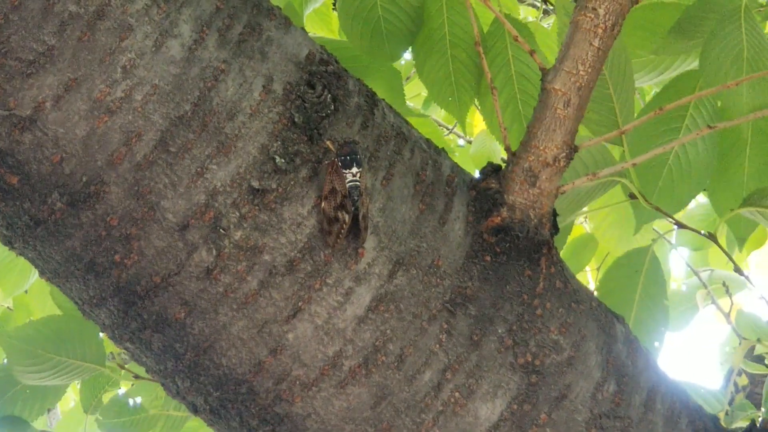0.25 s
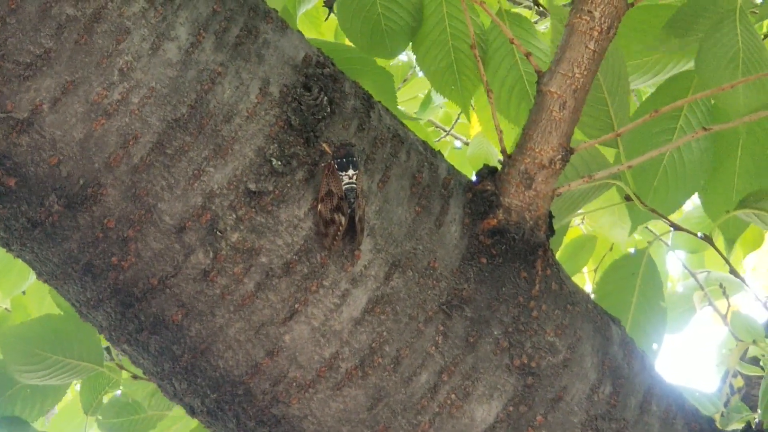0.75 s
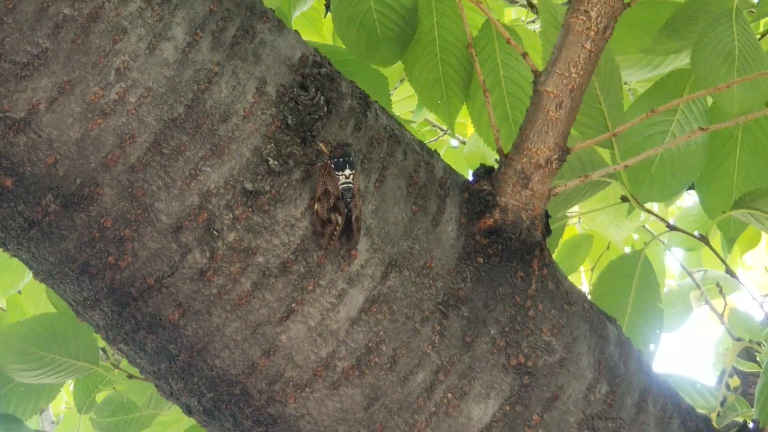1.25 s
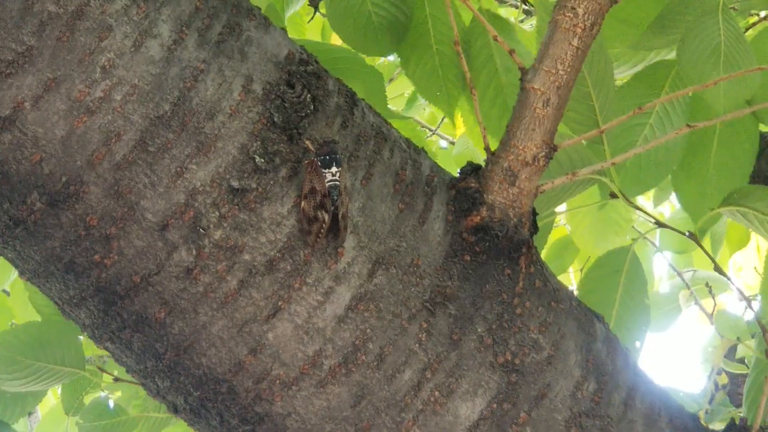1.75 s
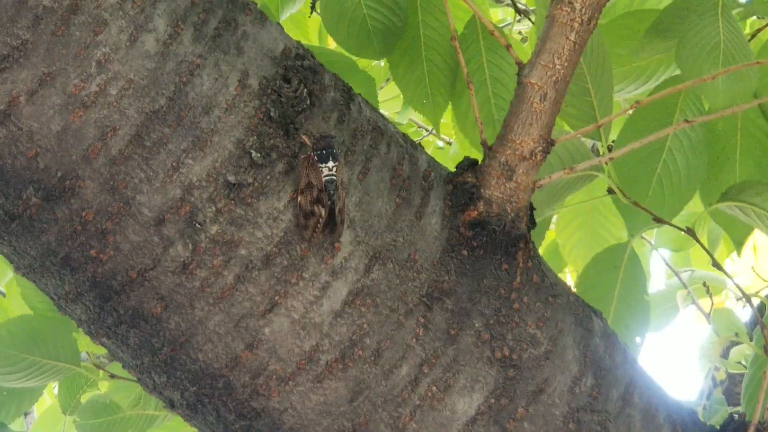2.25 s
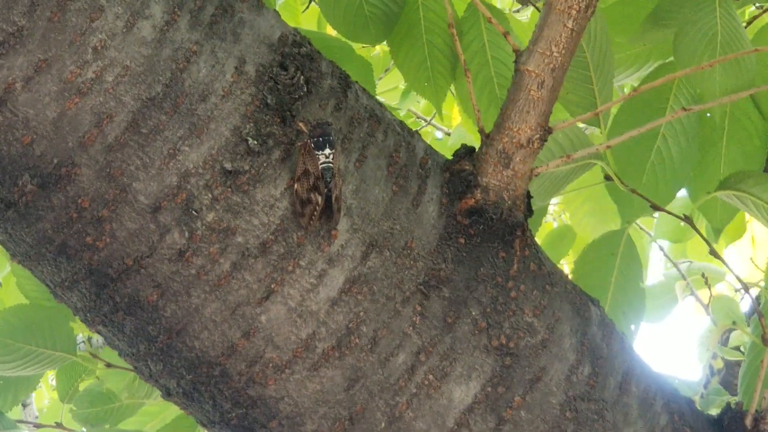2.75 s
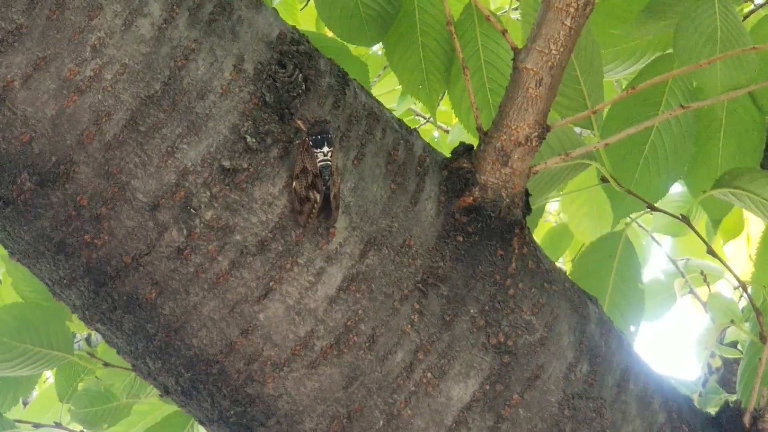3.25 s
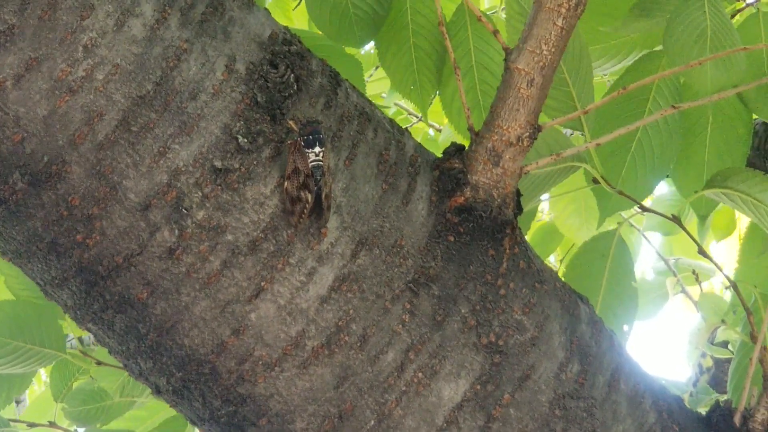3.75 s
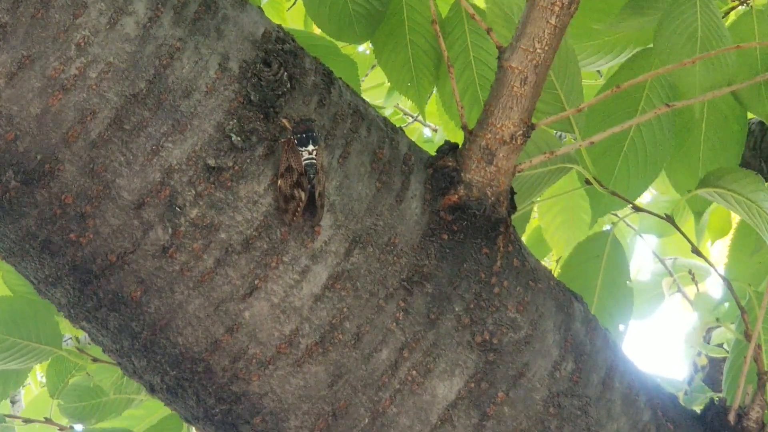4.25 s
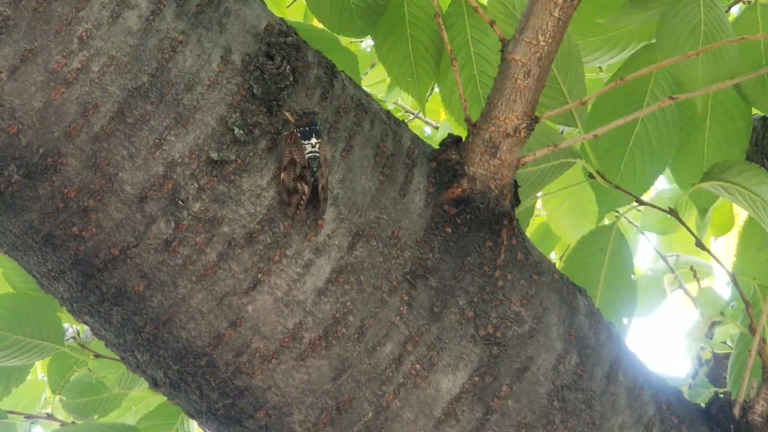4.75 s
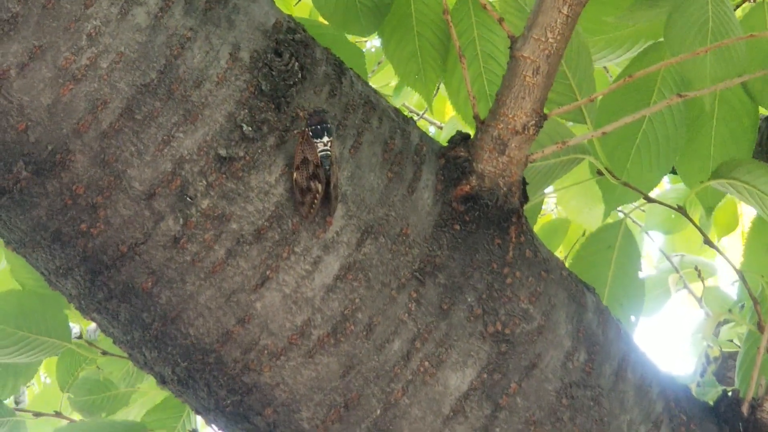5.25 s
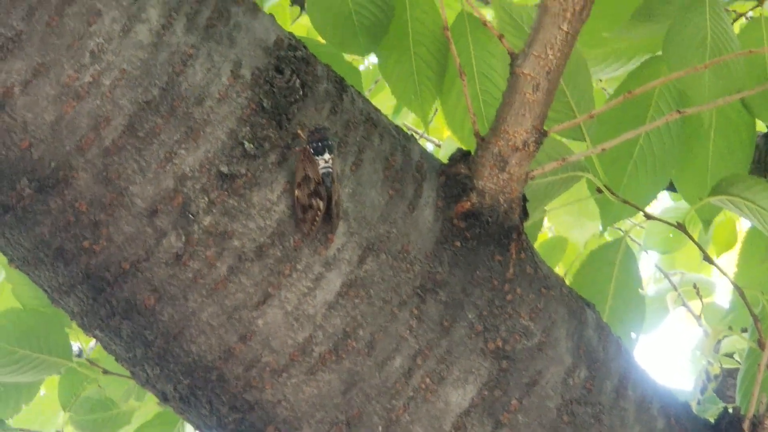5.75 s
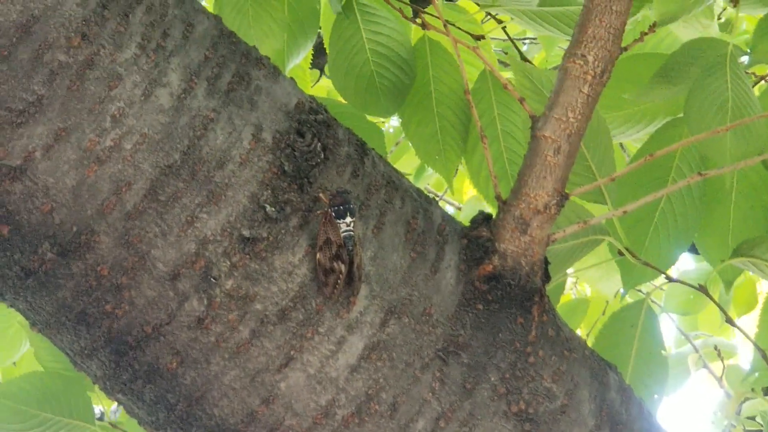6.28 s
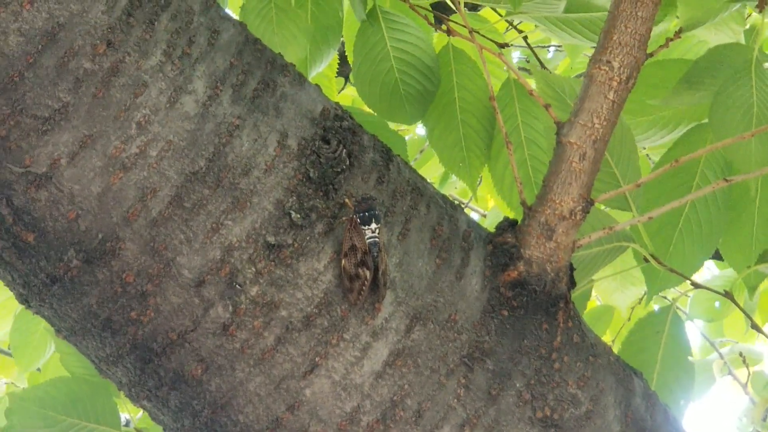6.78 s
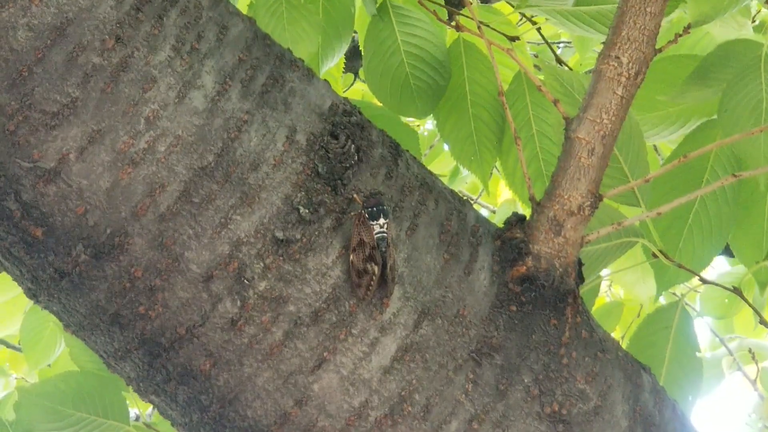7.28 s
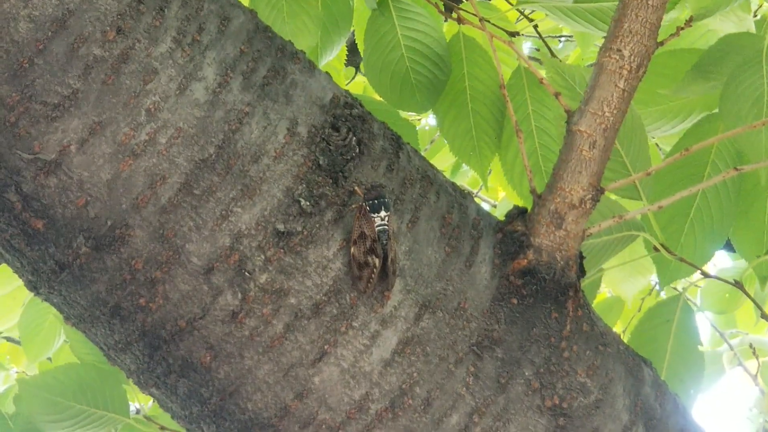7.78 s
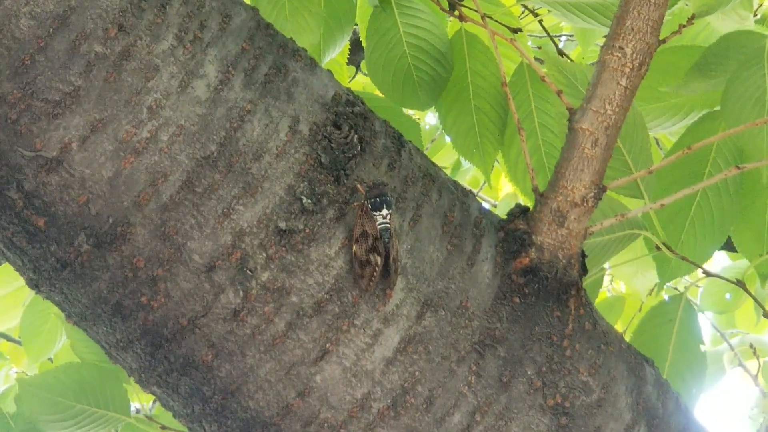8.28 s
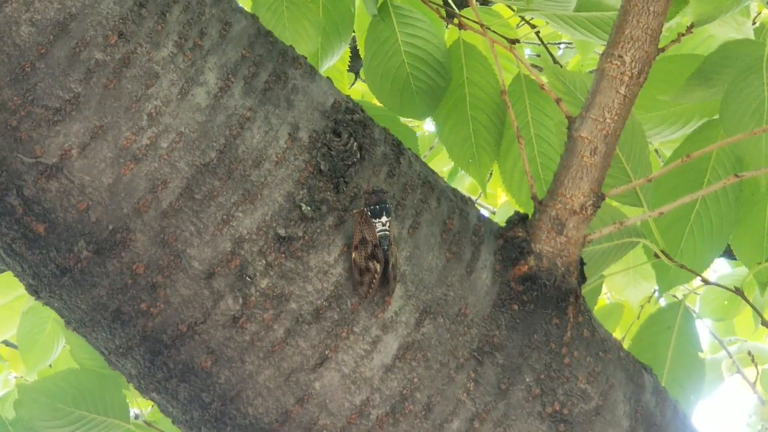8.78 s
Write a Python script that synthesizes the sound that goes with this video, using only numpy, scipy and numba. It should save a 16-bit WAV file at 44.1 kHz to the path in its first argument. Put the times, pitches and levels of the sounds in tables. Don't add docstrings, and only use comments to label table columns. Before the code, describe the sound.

Steady bright insect buzzing throughout: fast fluttering high sizzle, a blurred distant chorus near five kilohertz, and irregular small clicks. Over it a close cicada repeats brief buzzing swells that rise in pitch and stop abruptly, evenly spaced. Early soft bassy thuds and flutter come from wind on a hand-held stereo microphone, left side stronger; after about four seconds only insects and a dull distant traffic hum remain, the chorus strengthening slightly at the end.

```python
import sys
import numpy as np
from scipy import signal
from scipy.fft import rfft, irfft, next_fast_len
from scipy.io import wavfile
from scipy.ndimage import uniform_filter1d
from numba import njit

SR = 44100
rng = np.random.default_rng(int(sys.argv[2]) if len(sys.argv) > 2 else 0)


def dump_mix(stems):
    frames = np.atleast_2d(stems).T
    limited = np.clip(frames, -1, 1)
    pcm = np.round(limited * 32767).astype(np.int16)
    wavfile.write(sys.argv[1], SR, pcm)


def level_to_linear(level):
    exponent = np.asarray(level, float) / 20
    return 10 ** exponent


N = 397782
TIME = np.arange(N) / SR


def unit(x):
    return x / np.sqrt(np.mean(x ** 2))


def curve(table):
    return np.interp(TIME, *np.transpose(table))


def gate(start, end, edge_s):
    return np.clip(np.minimum(TIME - start, end - TIME) / edge_s + .5, 0, 1)


def walk(rate):
    k = int(SR / rate)
    drift = np.repeat(rng.standard_normal(N // k + 1), k)
    return unit(uniform_filter1d(uniform_filter1d(drift, k), k)[:N])


def shape(x, table, share=1):
    hz, db = np.transpose(table)
    size = next_fast_len(N)
    axis = np.log(np.arange(size // 2 + 1) * SR / size + 1)
    gain = level_to_linear(share * np.interp(axis, np.log(hz + 1), db))
    return irfft(rfft(x, size) * gain, size)[..., :N]


@njit
def svf(x, hz, width):
    y, band, low = np.empty(len(x)), 0., 0.
    for i in range(len(x)):
        g, k = np.tan(np.pi * hz[i] / SR), width / hz[i]
        v = (band + g * (x[i] - low)) / (1 + g * (g + k))
        band, low, y[i] = 2 * v - band, low + 2 * g * v, k * v
    return y


def ring(x, hz, width_hz):
    hz = np.clip(hz + np.zeros(N), 20, .45 * SR)
    width_hz = float(width_hz)
    return unit(svf(svf(x, hz, width_hz), hz, width_hz))


def clicks(rate_hz, jitter, scatter_db, rattle_s, snap):
    gap_chance, level_chance = rng.standard_normal((int(2 * rate_hz * N / SR), 2)).T
    gaps = np.clip(1 + jitter * gap_chance, .1, 3)
    at = (np.cumsum(gaps) * SR / rate_hz).astype(int)
    snaps = np.zeros(N)
    np.add.at(snaps, at[at < N], level_to_linear(scatter_db * level_chance)[at < N])
    decay = signal.lfilter([1], [1, -np.exp(-1 / (rattle_s * SR))], snaps)
    rattle = decay * rng.standard_normal(N)
    return unit(unit(rattle) + snap * unit(snaps))


def again(x, lag_s, db):
    return x + level_to_linear(db) * np.roll(x, int(lag_s * SR))


def place(x, pan_db, wet_db, size=512):
    frames = signal.stft(x, nperseg=size)[2]
    phases = np.exp(2j * np.pi * rng.random((2, *frames.shape)))
    echo = signal.istft(frames * phases, nperseg=size)[1][:, :N]
    echo = echo * np.sqrt(np.mean(x ** 2) / np.mean(echo ** 2))
    mixed = (x + level_to_linear(wet_db) * echo) / np.hypot(1, level_to_linear(wet_db))
    return mixed * level_to_linear(np.array([[pan_db], [-pan_db]]) / 2)


# top in seconds, low ring in dB, high ring in dB, blips before it in dB.
SWELL_TOPS = [(0.114, -22, -24, -37), (0.799, -23, -24.5, -41), (1.443, -23.5, -25, -40.5),
              (2.099, -24, -25, -41.5), (2.799, -24.5, -26.5, -41.5), (3.48, -25, -32.5, -43.5),
              (4.183, -22, -26.5, -42), (4.884, -22.5, -27, -39.5), (5.545, -24.5, -28, -41),
              (6.201, -23.5, -28.5, -39.5), (6.851, -22, -29.5, -38.5), (7.556, -23.5, -28, -39.5),
              (8.242, -22.5, -27.5, -38), (8.912, -23, -27, -38), (9.6, -23, -29, -38)]


def sweller():
    top_s, low_db, high_db, blip_db = np.transpose(SWELL_TOPS)
    k = np.clip(np.searchsorted(top_s + .1, TIME), 0, len(top_s) - 1)
    t = TIME - top_s[k]
    lift_from_s, let_go_s = -0.026, 0.02
    lift = np.clip((t - lift_from_s) / (let_go_s - lift_from_s), 0, 1)
    let_go_db = -900 * np.maximum(t - let_go_s, 0)

    base_db = -7.5 - 920 * (t + 0.053) ** 2 + let_go_db
    low_rise_db = -3000 * (t + 0.01) ** 2 + let_go_db
    high_rise_db = 446 * np.minimum(t + 0.012, 0) + 2 * let_go_db
    low_hz, high_hz = 4900 + 1100 * lift, 10400 + 1600 * lift

    drum = clicks(129, .06, 1.5, rattle_s=.005, snap=.7)
    blips = again(clicks(29, .25, 2, rattle_s=.0003, snap=4), .0092, -4)
    between_swells = sum(gate(a + 0.07, b - .08, 0.056) for a, b in zip(top_s[:-1], top_s[1:]))
    idle = level_to_linear(blip_db[k] + 3.4) * between_swells

    swell = ring(drum, 4550, 750) * level_to_linear(base_db) + ring(drum, low_hz, 1500) * level_to_linear(low_rise_db)
    low = level_to_linear(low_db[k]) * swell
    low = low + (ring(blips, 4450, 600) + level_to_linear(-3) * ring(blips, 5500, 1800)) * idle
    low = signal.sosfilt(signal.butter(8, 4150, "high", fs=SR, output="sos"), low)
    high = ring(drum, high_hz, 3800) * level_to_linear(high_db[k] + high_rise_db - 1.5)
    return place(low, 2.4, -6, size=256) + place(high, 5.1, 0.73)


# time in seconds, lead in cycles.
THROB_LEAD = [(0, -.08), (1, -.36), (2.5, -.5), (3.5, -.63), (4.8, -.52), (7, -.43), (7.6, -.27), (9, -.24)]
# frequency in Hz, density in dB per Hz.
SIZZLE_SPECTRUM = [(5500, -30), (6800, -6.5), (8000, -3.5), (9000, -14), (10000, -8), (11200, -2),
                   (12800, -3), (14000, 1), (15500, -4), (17000, -6.5)]


def throbber(level_db):
    beat_hz = 14.85
    turn = 2 * np.pi * (beat_hz * TIME + curve(THROB_LEAD) - .2)
    drum = again(clicks(183, .004, 1.0, rattle_s=.004, snap=0.6), .00273, -2)
    hz = 6800 + 500 * np.cos(turn - 2 * np.pi * .83)
    swell_db = 4.5 * np.cos(turn - 2 * np.pi * .74)
    upper = level_to_linear(-4.3 + swell_db) * ring(drum, 2 * hz, 2800)
    lower = level_to_linear(-11 - .4 * swell_db) * ring(drum, hz * .97, 1200)
    sizzle = unit(shape(clicks(1300, .15, 0.33, rattle_s=0.00061, snap=0.074), SIZZLE_SPECTRUM))
    return place(level_to_linear(level_db - 1.4) * (upper + lower + sizzle), 0.34, -4.5)


# twitch rate per second, level in dB.
FAR_SINGERS = [(368.3, -1), (344.2, -4), (314.2, 0.5), (456.3, -5)]
# frequency in Hz, density in dB per Hz.
CHORUS_SPECTRUM = [(1500, -38), (2500, -37.5), (3600, -21.5), (4200, -19.5), (4600, -8.5), (4950, 1),
                   (5300, 2), (5900, -1.5), (6500, -6), (7500, -21), (9000, -25)]
# start in seconds, end in seconds, frequency in Hz, level in dB.
FAR_WHINES = [
    (1.2, 6.6, 5306, -38),
    (1.9, 5.2, 5688, -40),
    (1.2, 3.5, 6065, -42),
    (0, 1.9, 6450, -44),
    (1.5, 3, 5135, -42),
    (5.55, 6.2, 5862, -37),
    (5.6, 6, 11170, -43),
    (7.2, 9, 5560, -41),
    (4, 6.4, 13940, -43),
    (6.9, 9, 5240, -41),
]


def chorus(level_db):
    trains = sum(level_to_linear(db + walk(3)) * clicks(rate_hz, .015, 1.5, rattle_s=.0013, snap=.55)
                 for rate_hz, db in FAR_SINGERS)
    sizzle = unit(shape(trains, CHORUS_SPECTRUM)) * level_to_linear(level_db + 1.0)
    whine = np.zeros(N)
    for start, end, hz, db in FAR_WHINES:
        level = level_to_linear(db + 1.5 + 3.5 * walk(14)) * gate(start, end, .15)
        whine += level * np.sin(2 * np.pi * np.cumsum(hz + 8 * walk(15)) / SR)
    return place(sizzle, 0, -1.5, size=2048) + place(whine, 0, -8, size=4096)


# frequency in Hz, density in dB per Hz.
HISS_SPECTRUM = [(180, -19.5), (300, 0.5), (433, -8.5), (694, -5), (1440, -13.5), (3000, -11), (3900, -54),
                 (6600, -120)]
# frequency in Hz, density in dB per Hz.
RUMBLE_SPECTRUM = [(12, -51), (20, -26), (42, -1.5), (97, 1.5), (167, -2.5), (195, -3), (222, -4),
                   (286, -8.5), (600, -24.5), (780, -29), (1320, -120)]
# start in seconds, end in seconds, frequency in Hz, level in dB.
ENGINE_HUMS = [
    (0.453, 1.012, 199.7, -48.5),
    (3.688, 4.948, 134.6, -46.5),
    (4.7, 6.276, 74, -51),
    (5.4, 9.026, 192.7, -54.5),
    (6.61, 9.02, 100, -51),
]


def town(hiss_db, rumble_db):
    hiss_mid, hiss_side, rumble_mid, rumble_side = rng.standard_normal((4, N))
    hiss = unit(shape(hiss_mid + 0.41 * np.array([hiss_side, -hiss_side]), HISS_SPECTRUM))
    hiss = hiss * level_to_linear(hiss_db + 3.5 + 0.27 * walk(3.64))
    rumble = unit(shape(rumble_mid + 0.062 * np.array([rumble_side, -rumble_side]), RUMBLE_SPECTRUM))
    rumble = rumble * level_to_linear(rumble_db + 0.54 * walk(4.006))
    hums = sum(level_to_linear(db) * gate(start, end, 0.099) * ring(rng.standard_normal(N), hz, 12.7)
               for start, end, hz, db in ENGINE_HUMS)
    return hiss + rumble + hums


# first tick in seconds, last tick in seconds, number of ticks.
TICK_RUNS = [(.072, .209, 3), (.2713, .5127, 5), (.5834, .7507, 4), (.819, .895, 2), (.9547, 1.4285, 9),
             (1.5045, 1.724, 5), (1.7978, 2.0986, 6), (2.175, 2.3595, 4), (2.4104, 2.7342, 7),
             (2.8414, 2.8988, 2), (3.0677, 3.272, 4), (3.3313, 3.4655, 3), (3.5897, 4.1879, 10),
             (4.2792, 4.6563, 7), (4.778, 4.9122, 3), (4.9526, 5.1123, 4), (5.1936, 5.2934, 2),
             (5.3652, 5.4705, 3), (5.5822, 6.041, 9), (6.0881, 6.1913, 3), (6.3937, 6.6313, 5),
             (6.6717, 6.8304, 4), (6.9077, 7.1357, 6), (7.2035, 7.3138, 3), (7.4061, 7.5827, 4),
             (7.6595, 7.709, 2), (7.9359, 8.1723, 5), (8.3235, 8.4512, 4), (8.514, 8.9485, 8)]
# start in seconds, end in seconds, level in dB.
LONG_RASPS = [
    (2.89, 2.968, -38),
    (5.13, 5.2, -37.5),
    (5.458, 5.55, -36.5),
    (8.395, 8.484, -37.5),
]
# centre in Hz, width in Hz, gain in dB.
BODY_BANDS = [(3250, 1700, 5.5), (4900, 900, 17), (9400, 800, 9), (10600, 1800, 12)]
# centre in Hz, width in Hz, gain in dB.
ABDOMEN_RINGS = [(4900, 300, 4.5), (10740, 860, -5)]


def ticker():
    tick_s = np.concatenate([np.linspace(*run) for run in TICK_RUNS])
    peak_db = -35 + 1.6 * rng.standard_normal(len(tick_s))
    blows = np.zeros(N)
    sign = np.sign(rng.standard_normal(len(tick_s)))
    blows[((tick_s + .0012) * SR).astype(int)] = level_to_linear(peak_db + 12.5) * sign
    decay = signal.lfilter([1], [1, -np.exp(-1 / (0.005 * SR))], np.abs(blows))
    rattle = level_to_linear(-16) * decay * rng.standard_normal(N)

    rasp_drum = clicks(122, 0.023, 1.7, rattle_s=0.0054, snap=0.41)
    rasp_level = sum(level_to_linear(db) * gate(start, end, 0.026) for start, end, db in LONG_RASPS)
    drive = again(again(blows, .0084, -9), .0021, -6) + rattle + rasp_drum * rasp_level
    body = np.zeros(N)
    for hz, width, db in BODY_BANDS:
        band = signal.butter(3, [hz - width / 2, hz + width / 2], "band", fs=SR, output="sos")
        body += level_to_linear(db) * signal.sosfilt(band, drive)
    ring_level = sum(level_to_linear(db) * gate(start, end, 0.018) for start, end, db in LONG_RASPS)
    body = body + ring_level * sum(level_to_linear(db) * ring(rasp_drum, hz, width) for hz, width, db in ABDOMEN_RINGS)
    return place(body, 1.5, -12, size=128)


# time in seconds, peak in dB, swing frequency in Hz.
STRONG_PUFFS = [(0.267, -19.5, 111), (0.367, -19.5, 167), (0.402, -17, 147), (.694, -20, 175),
                (.77, -20, 95), (.788, -23.5, 161), (1.056, -11.5, 123), (1.081, -18, 165),
                (1.142, -30, 121), (1.448, -21, 148), (1.748, -15, 137.5), (1.823, -19, 155.6),
                (2.386, -12, 101), (2.413, -14.5, 135), (2.512, -25, 135.8), (2.577, -16, 157.5),
                (2.664, -22, 155), (2.705, -23, 165), (2.727, -17.5, 173), (2.744, -10.5, 147),
                (2.795, -25, 173), (2.907, -21, 119), (3.153, -23, 190), (3.723, -30, 135)]
# start in seconds, end in seconds, peak in dB.
FLUTTERS = [(0.099, .14, -35), (.34, 0.497, -28.5), (0.698, 0.803, -29), (1.091, 1.18, -28),
            (1.358, 1.468, -30), (1.568, 1.72, -38), (1.799, 2.08, -31.5), (2.227, 2.28, -28.5),
            (2.391, 2.65, -27), (2.659, 2.81, -24), (2.82, 3.0, -33.5), (3.701, 3.82, -29.5)]
# frequency in Hz, density in dB per Hz.
RUSTLE_SPECTRUM = [(12, -36), (30, -30), (70, 4), (150, 1.5), (300, -8.5), (450, -19.5), (700, -43)]


def wind():
    gap_s = .016
    small = [(s, db) for start, end, db in FLUTTERS for s in np.arange(start, end, gap_s)]
    chance = rng.standard_normal((len(small), 4))
    puffs = [(s, db, hz, 0.0043) for s, db, hz in STRONG_PUFFS]
    for (s, db), (a, b, c, d) in zip(small, chance):
        puffs.append((s + 0.296 * gap_s * a, db + 1.8 * b, 106.5 * (1 + 0.2 * c), 0.0059 * level_to_linear(2 * d)))

    swing, strength = np.zeros(N), np.zeros(N)
    for k, (s, db, hz, width_s) in enumerate(puffs):
        near = slice(int((s - .06) * SR), int((s + .06) * SR))
        t = TIME[near] - s
        bell = level_to_linear(db) * np.exp(-(t / width_s) ** 2)
        swing[near] += bell * np.cos(2 * np.pi * (hz * t + k * .382))
        strength[near] += bell
    rustle = unit(shape(rng.standard_normal(N), RUSTLE_SPECTRUM))
    left = level_to_linear(0.5) * swing + level_to_linear(-2.0) * uniform_filter1d(strength, size=900) * rustle
    return np.array([left, level_to_linear(-8.0) * left])


# time in seconds, gain in dB.
RECORDER_GAIN = [(0, 1), (2.9, 1), (3.39, -1), (3.64, -2.5), (3.84, -0.5), (4.2, 0.5), (9.02, 0.5)]
# time in seconds, level in dB.
CHORUS_EFFORT = [(0, -29), (.55, -31), (1.0, -30), (1.9, -31), (2.6, -29.5), (3.4, -30.5), (4.4, -29.5),
                 (5.05, -29.5), (5.6, -29.5), (6.3, -29), (7.5, -28), (9.02, -25)]
# time in seconds, nearness in dB.
TRAFFIC_NEARNESS = [(0, -1.5), (1.9, -1), (3.6, 1.5), (4.4, 2.5), (6.0, 2), (7.1, 0), (7.6, 2),
                    (9.02, -1.5)]
# frequency in Hz, left minus right in dB.
PORT_BALANCE = [(60, -0.5), (110, 1.5), (200, 0.5), (380, 0), (700, 0), (1290, 4), (2380, 3.5),
                (4400, -1.5), (8120, 3.5), (15000, 1)]


def scene():
    traffic_db = curve(TRAFFIC_NEARNESS)
    dip_db = -5 * np.exp(-((TIME - 3.4) / 0.11) ** 2)
    rumble_db = -44 - 0.4 * (TIME - 4) + 0.67 * traffic_db + dip_db
    air = throbber(-29.5) + chorus(curve(CHORUS_EFFORT)) + town(-56.5 + traffic_db, rumble_db) + ticker()
    air = sweller() + level_to_linear(curve(RECORDER_GAIN)) * air
    left, right = shape(air[0], PORT_BALANCE, share=.5), shape(air[1], PORT_BALANCE, share=-.5)
    return np.array([left, right]) + wind()


def band_limit(x):
    return signal.sosfilt(signal.butter(12, 16680, fs=SR, output="sos"), x)


def record(dry):
    top_hz = 15600
    mix = signal.sosfilt(signal.ellip(10, .3, 70, top_hz, fs=SR, output="sos"), dry)
    return band_limit(mix)


dry = scene()
out = record(dry)
dump_mix(out)
```